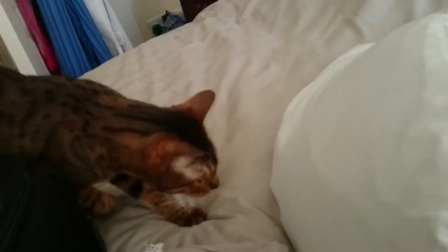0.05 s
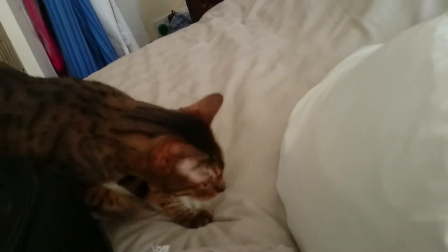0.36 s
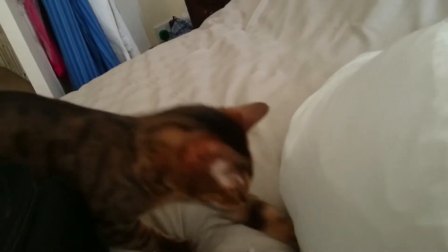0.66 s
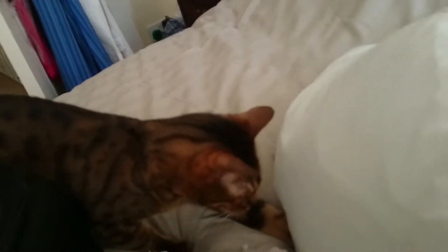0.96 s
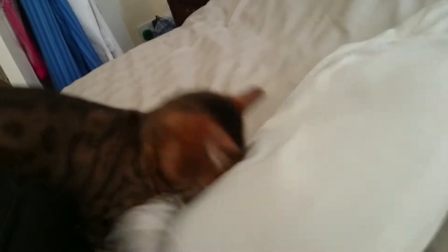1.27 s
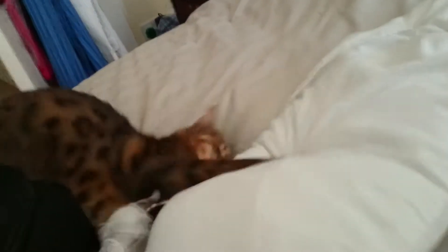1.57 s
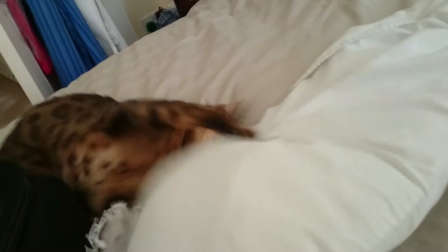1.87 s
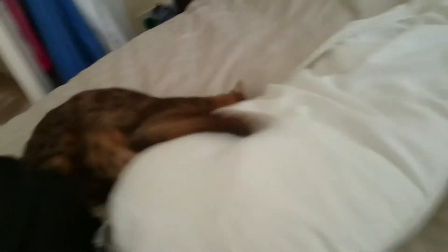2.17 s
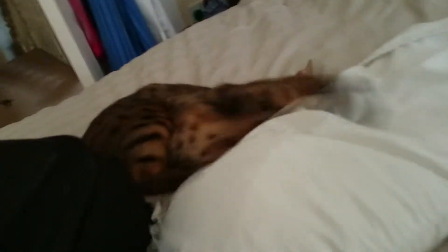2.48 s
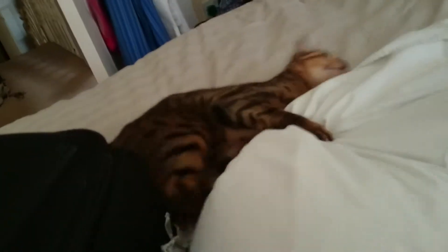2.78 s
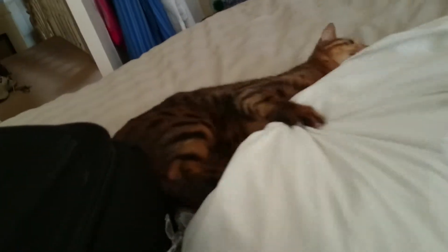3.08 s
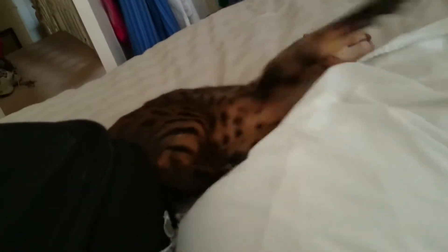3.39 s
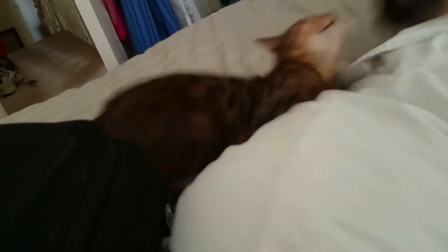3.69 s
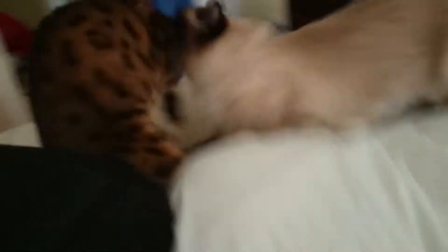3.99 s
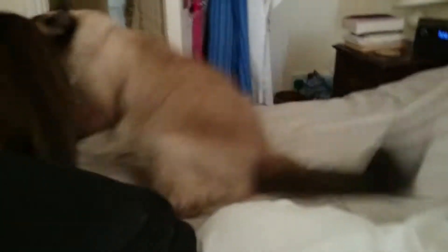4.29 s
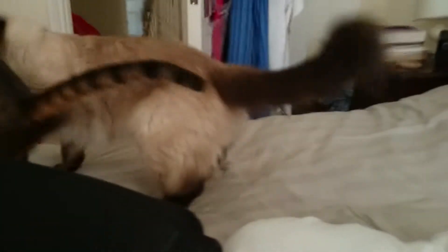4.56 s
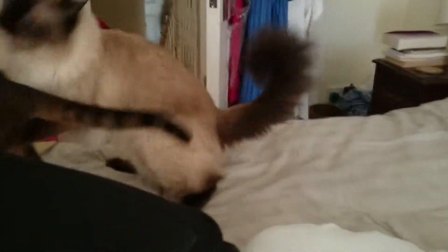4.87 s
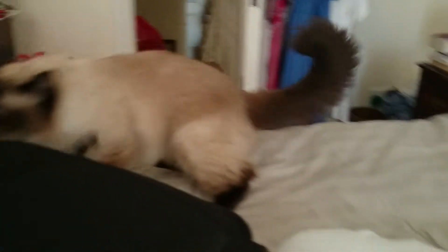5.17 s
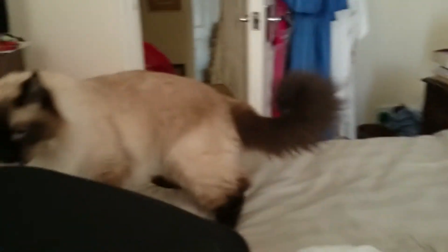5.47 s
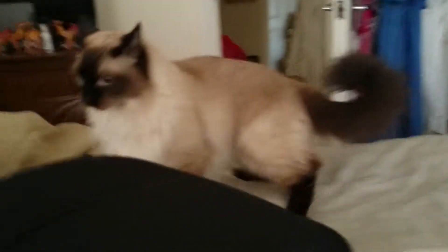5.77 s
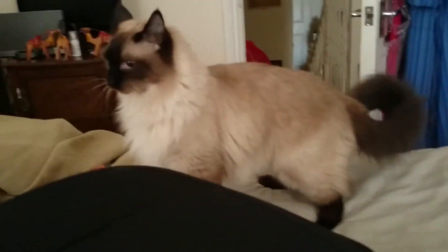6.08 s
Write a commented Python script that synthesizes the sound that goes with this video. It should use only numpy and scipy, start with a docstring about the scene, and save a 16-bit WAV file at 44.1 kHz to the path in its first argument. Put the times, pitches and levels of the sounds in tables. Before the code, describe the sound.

Close, uneven rustling of bedding and muffled paw thuds as two cats tussle on a bed, over a faint low handling rumble.

```python
"""A quiet bedroom, with a hand-held phone right next to two cats wrestling on a duvet.
Paws and bodies thud into the bedding, claws rasp and snag on the cotton, and fur and cloth rub in
swishes. The mattress booms under the landings, and the heaving duvet fans air at the left microphone
port. The hand that holds the phone rests on the right port, which rumbles and creaks softly."""
import sys
import numpy as np
from scipy import signal
from scipy.fft import rfft, irfft, next_fast_len
from scipy.io import wavfile

SR = 44100
rng = np.random.default_rng(int(sys.argv[2]) if len(sys.argv) > 2 else 0)


def file_out(sig):
    """Save sig as 16-bit WAV at sys.argv[1]."""
    # one column per channel
    cols = np.atleast_2d(sig).T
    # limit, then scale
    lim = np.clip(cols, -1, 1)
    pcm = np.round(lim * 32767).astype(np.int16)
    wavfile.write(sys.argv[1], SR, pcm)


N = 275181
TIME = np.arange(N) / SR

# Tone colours of the sources. Each row: frequency in Hz, gain in dB.
ROOM_COLOUR = [(20, -8), (60, 7), (130, -1), (250, -4), (500, -12), (1000, -15), (2000, -18.5), (5000, -26),
               (15000, -45)]  # the still bedroom
FINGER_COLOUR = [(1, -4), (6, -2), (12, -3), (25, -18.5), (50, -25), (100, -34), (200, -55), (400, -50.5),
                 (1500, -91)]  # skin on the port
BUFFET_COLOUR = [(5, 1), (25, 4), (60, -1), (110, -6.5), (200, -13.5), (600, -61.5)]  # air on the port
CASE_COLOUR = [(80, -10.5), (200, -4.5), (300, -1), (420, 2), (600, -13), (1000, -22), (3000, -41),
               (10000, -76)]  # the creaking phone case
HISS_COLOUR = [(300, -17.5), (1200, -9), (2800, -1.5), (5000, -4), (8000, -2), (12000, -5.5),
               (16000, -14.5)]  # the duvet's surface
CRUMPLE_COLOUR = [(50, -6), (110, 13.5), (220, 6), (400, 5), (900, 0.5), (2000, -3.5), (4000, -13),
                  (9000, -45.5)]  # its filling
SNAG_COLOUR = [(200, -13), (900, 6), (2300, 7.5), (5000, 5), (9000, 5.5), (13500, -1), (16000, -10.5)]  # plucked cotton threads
# Each microphone port is a small tube with its own resonances. Each row: frequency in Hz, gain in dB.
LEFT_PORT_COLOUR = [(100, 3.5), (4000, 0), (5500, -2.5), (6800, -1.5), (8300, 8.5), (9500, 1.5),
                    (10800, 2.5), (12100, 7), (13900, -10.5), (15000, 3)]
RIGHT_PORT_COLOUR = [(100, 7.5), (400, 2), (1000, -1), (2500, -2), (4600, 1), (5800, 8), (7200, -10),
                     (9500, -15), (13500, -10.5), (15200, -6)]
# The finger on the right port, firmer as the hand follows the cats.
# Each row: time in seconds, relative level in dB.
FINGER_PRESSURE = [(0, -44.5), (.3, -59.5), (.9, -51.5), (1.45, -48), (2.2, -51.5), (3.05, -44.5),
                   (3.35, -56.5), (3.95, -41.5), (4.75, -50), (5.25, -43.5), (6.24, -48)]
# Fingers slipping on the case. Each row: start in seconds, level in dB, length in seconds.
CASE_CREAKS = [(0.458, -58.5, 0.0041), (0.864, -50.5, 0.01), (1.512, -51, 0.0066), (1.8, -56.5, 0.0057),
               (2.348, -54, 0.0078), (2.719, -53.5, 0.017), (3.306, -55.5, 0.0027), (4.661, -59.5, 0.05),
               (5.011, -58, 0.029), (5.066, -59.5, 0.045), (5.419, -52, 0.035), (5.548, -51, 0.024),
               (5.594, -55.5, 0.058), (5.784, -72, 0.028), (5.879, -56.5, 0.022), (6.087, -56.5, 0.029),
               (6.192, -50.5, 0.019)]
# The duvet fanning the left port. Each row: peak time and fall time in seconds, relative level in dB.
DUVET_GUSTS = [(1.27, .04, -48), (1.48, 0.037, -43), (1.89, .04, -52), (2.0, .06, -52), (2.81, .04, -41),
               (3.08, .05, -41), (3.56, .1, -50), (3.88, 0.11, -41), (4.12, .08, -44), (4.37, 0.2, -48),
               (4.92, 0.045, -45.5)]
# The cats shifting on the bedding between sweeps. Each row: time in seconds, relative level in dB.
STIRRING = [(.5, -82), (.7, -67.5), (1.16, -93), (1.35, -69), (1.85, -68.5), (2.75, -62), (3.3, -70),
            (3.85, -59.5), (4.27, -68.5), (4.65, -64.5), (5.15, -70.5), (5.8, -68.5), (6.24, -77)]
# A limb or body sweeping over the cloth. Each row: peak time and fall time in seconds,
# relative levels of surface hiss and of crumpling filling in dB.
CLOTH_SWISHES = [(0.562, 0.037, -62.5, -63.5), (0.725, 0.067, -59, -58.5), (1.245, 0.031, -64, -54.5),
                 (1.282, 0.061, -50, -54.5), (1.44, 0.035, -57, -57), (1.554, 0.19, -65, -63.5),
                 (1.62, 0.042, -58.5, -52), (1.722, 0.053, -56, -59), (2.003, 0.04, -65.5, -55),
                 (2.159, 0.019, -57, -54), (2.3, 0.053, -61.5, -59.5), (2.46, 0.057, -50.5, -59),
                 (2.599, 0.052, -56.5, -54), (2.73, 0.052, -57, -65), (2.8, 0.041, -52, -49.5),
                 (2.989, 0.037, -58, -58), (3.077, 0.045, -52, -50), (3.396, 0.056, -65, -62.5),
                 (3.584, 0.087, -57.5, -57), (3.761, 0.064, -55, -52), (3.942, 0.094, -48, -54.5),
                 (4.014, 0.056, -45, -45.5), (4.214, 0.035, -55.5, -52.5), (4.356, 0.043, -57, -56.5),
                 (4.491, 0.021, -49.5, -55.5), (4.559, 0.045, -56, -58), (4.767, 0.073, -61.5, -93),
                 (5.294, 0.061, -68, -60.5), (5.59, .08, -84, -63.5), (5.764, 0.039, -59, -56),
                 (5.886, 0.024, -65.5, -67)]
# The hiss above 10 kHz, duller once the cats move away. Each row: time in seconds, gain in dB.
HISS_SHEEN = [(.7, 1), (2.1, 2.5), (3.9, -0.5), (4.4, -3), (6.24, -3)]
# Paws and bodies hitting the duvet. Each row: start in seconds, level in dB, contact time in ms.
PAW_BLOWS = [(0.55, -54.5, 0.36), (0.7039, -50.5, 0.44), (0.714, -49, 0.51), (1.2595, -43.5, 0.18),
             (1.275, -53, 0.1), (1.437, -54, 0.18), (1.6053, -48.5, 0.34), (1.616, -46.5, 0.24),
             (1.869, -55, 0.39), (1.9784, -42.5, 0.077), (1.99, -53, 0.076), (2.036, -50, 0.14),
             (2.292, -54, 0.23), (2.5281, -34.5, 0.24), (2.5912, -44, 0.26), (2.805, -35, 0.46),
             (2.809, -36.5, 2), (2.8308, -45, 0.092), (3.0658, -32, 0.097), (3.0701, -36.5, 1.7),
             (3.0826, -39.5, 0.17), (3.0955, -43, 0.16), (3.1063, -44.5, 1), (3.1376, -49.5, 0.74),
             (3.172, -49.5, 1.4), (3.3983, -48, 0.57), (3.5262, -48, 0.77), (3.617, -43.5, 0.44),
             (3.727, -47, 0.21), (3.7409, -51, 0.14), (3.9411, -31.5, 0.64), (3.96, -47.5, 0.25),
             (4.0048, -35.5, 0.16), (4.0081, -31, 1.16), (4.025, -41, 0.47), (4.0294, -34, 0.26),
             (4.0608, -46.5, 0.16), (4.081, -48, 0.18), (4.1867, -51.5, 0.32), (4.198, -48.5, 0.88),
             (4.338, -50, 0.99), (4.358, -53.5, 0.38), (4.5407, -55.5, 1.1), (5.256, -55.5, 0.11),
             (5.287, -55, 0.37), (5.748, -53.5, 0.16), (5.7756, -56.5, 0.045)]
# The padded duvet's brief resonances. Each row: frequency in Hz, width in Hz, gain in dB.
DUVET_MODES = [(192, 140, -4.5), (247, 145, -3.5), (775, 660, -6), (966, 106, -12), (1870, 1200, -22)]
# A claw or pad dragged over the weave. Each row: start and length in seconds, pitch in Hz, level in dB.
WEAVE_SCRAPES = [(0.674, 0.064, 3300, -60), (1.28, 0.045, 3750, -51), (1.429, 0.026, 2800, -72),
                 (1.672, 0.057, 8100, -60), (2.445, 0.047, 8850, -54.5), (2.546, 0.079, 2080, -55.5),
                 (2.606, 0.058, 2220, -58), (2.685, 0.07, 9400, -61), (3.505, 0.046, 1400, -62),
                 (3.949, 0.11, 2290, -52.5), (4.176, 0.016, 1550, -54.5), (4.532, 0.083, 4800, -57.5),
                 (4.926, 0.031, 2040, -63), (4.95, 0.028, 2510, -65.5), (5.058, 0.068, 800, -66),
                 (5.23, 0.04, 1900, -67), (5.256, 0.023, 825, -57.5), (5.29, .05, 1300, -71),
                 (5.747, 0.051, 2620, -63), (5.412, 0.044, 930, -63), (5.673, 0.027, 1500, -62.5)]
# Claws snapping free of the cotton.
# Each row: start in seconds, relative level in dB, decay in ms, gain of the top treble in dB.
CLAW_SNAGS = [(1.2423, -49, 2.2, 1), (1.259, -50, 2.4, -10), (1.675, -54, 2.1, -7), (1.978, -52, 1.4, -1),
              (2.1512, -41.5, 0.96, 11), (2.5282, -41, .7, 1), (2.8037, -39, 1.7, -2.5),
              (3.041, -57.5, 2, 5), (3.067, -58, 2.8, 6), (3.083, -60, 3, -3), (3.375, -58, 1.6, 12),
              (3.3968, -48.5, 0.97, -6), (3.617, -53, 1.3, 2), (3.7412, -46.5, 2, -3),
              (4.026, -41, 2.9, -12), (4.541, -47.5, 1.8, 3), (4.5488, -48.5, 10, -10)]
# A cat's weight sinking into the mattress. Each row: start in seconds, level in dB.
LANDINGS = [(3.422, -57), (3.525, -44), (3.622, -42.5), (4.07, -43.5), (4.191, -46), (4.381, -42.5)]
# The mattress's resonances. Each row: frequency in Hz, seconds to fall 60 dB, gain in dB.
MATTRESS_MODES = [(101.7, 0.16, 2), (114.8, 0.16, 2.5)]


def undb(db):
    """Decibels to gain."""
    return 10 ** (np.asarray(db) / 20)


def unit(x):
    """Scale to rms 1."""
    return x / np.sqrt(np.mean(x ** 2))


def at_level(x, db):
    """Give a short sound the energy of 10 ms at this level."""
    return x * undb(db) / np.sqrt(np.sum(x ** 2) / (.01 * SR))


def curve(table):
    """Join (seconds, value) points into a line through time."""
    return np.interp(TIME, *np.transpose(table))


def add(track, start, x):
    """Mix a short sound into a track at a start in seconds."""
    i = int(start * SR)
    track[..., i:i + x.shape[-1]] += x[..., :N - i]


def colour(x, points):
    """Causal filter through (Hz, dB) points, from the cepstrum of its log gain."""
    size = next_fast_len(x.shape[-1] // 2 + 4096, real=True) * 2
    hz, db = np.transpose(points)
    log_hz = np.log(np.fft.rfftfreq(size, 1 / SR) + 0.00091)
    cepstrum = irfft(np.log(undb(np.interp(log_hz, np.log(hz), db))))
    cepstrum[1:size // 2] *= 2
    cepstrum[size // 2 + 1:] = 0
    return irfft(rfft(x, size) * np.exp(rfft(cepstrum)))[..., :x.shape[-1]]


def wander(rate_hz):
    """Smooth random wandering with rms 1."""
    knots = rng.standard_normal(4096)
    return unit(np.interp(TIME * rate_hz, np.arange(len(knots)), knots))


def stereo(pair, alike):
    """Mix two unrelated signals into a left and a right that are partly alike."""
    mid, side = np.sqrt(1 + alike) * pair[0], np.sqrt(1 - alike) * pair[1]
    return np.array([mid + side, mid - side]) / np.sqrt(2)


def fibre_slips(per_s, spread_db):
    """Two streams of tiny clicks, most weak and a few strong."""
    sizes = undb(spread_db * np.minimum(rng.exponential(size=(2, N)), 5))
    return unit((rng.random((2, N)) < per_s / SR) * sizes * rng.choice([-1, 1], (2, N)))


def motion(moves, steady_db, rise_share=0.73):
    """Gain of movements that gather speed and come to rest; their powers add over a steady level."""
    power = 0
    for peak_s, fall_s, db in moves:
        lag = (TIME - peak_s) / fall_s
        from_peak = np.maximum(-lag / rise_share, lag)
        swell = np.exp(-np.minimum(from_peak, 20) ** 1.34)
        power += (undb(db) * swell) ** 2
    return np.sqrt(undb(steady_db) ** 2 + power)


def room_tone(level_db=-67):
    """The bedroom's faint, steady background."""
    noise = stereo(rng.standard_normal((2, N)), alike=0.17)
    return undb(level_db) * unit(colour(noise, ROOM_COLOUR))


def port_rumble(finger_db=9, tremble_db=2, draught_db=5.5, buffet_db=-2):
    """An unsteady finger presses on the right port; air moved by the cats and cloth buffets the left."""
    finger = unit(colour(rng.standard_normal(N), FINGER_COLOUR))
    right = finger * undb(curve(FINGER_PRESSURE) + finger_db + tremble_db * wander(9.8))
    airflow = motion(DUVET_GUSTS, curve(STIRRING) + draught_db)
    buffet = unit(colour(rng.standard_normal(N), BUFFET_COLOUR))
    left = buffet * airflow * undb(buffet_db + 2.5 * wander(2.54))
    return np.array([left, right])


def bedding(hiss_db=-2, stir_crumple_db=-2.5, patchy_db=1.8):
    """Fibres slip densely on the surface; bigger folds give way in uneven jerks below."""
    stir_db = curve(STIRRING)
    sliding = motion([(s, fall, db) for s, fall, db, _ in CLOTH_SWISHES], stir_db)
    folding = motion([(s, fall, db) for s, fall, _, db in CLOTH_SWISHES], stir_db + stir_crumple_db)
    jerk = wander(70)
    slips = stereo(fibre_slips(per_s=11000, spread_db=2.5), alike=0.057)
    # patches of cloth slide at different speeds, so each pitch range swells and fades by itself
    size = next_fast_len(N, real=True)
    spectrum, hz = rfft(slips, size), np.fft.rfftfreq(size, 1 / SR)
    edges_hz = [0, 1200, 1900, 2800, 4000, 5600, 7600, 10000, SR]
    bands = [irfft(spectrum * (hz >= low) * (hz < high), size)[:, :N] * undb(patchy_db * wander(30))
             for low, high in zip(edges_hz, edges_hz[1:])]
    bands[-1] *= undb(curve(HISS_SHEEN))
    hiss = unit(colour(sum(bands), HISS_COLOUR))
    folds = stereo(fibre_slips(per_s=2500, spread_db=2.0), alike=0.6)
    crumple = unit(colour(folds, CRUMPLE_COLOUR))
    return hiss * sliding * undb(hiss_db + 1.4 * jerk) + crumple * folding * undb(2.13 * jerk)


def case_creaks(slip_hz=170, bump_hz=105, bump_db=3, bump_fade_db_per_s=170, left_db=-36):
    """A fingertip by the right port lets go with a dull bump, then sticks and slips on the case."""
    out, t = np.zeros(N), TIME[:SR // 10]
    bump = np.sin(2 * np.pi * bump_hz * t) * np.exp(-t / 0.0048)
    for start, db, length in CASE_CREAKS:
        gaps, sizes = rng.uniform(.3, 1.7, (2, 64))
        slip_s = (np.cumsum(gaps) - gaps[0]) / slip_hz
        inside = slip_s < length
        slips = np.bincount((slip_s[inside] * SR).astype(int), sizes[inside], SR // 8)
        creak = colour(slips, CASE_COLOUR)
        # a long, easy slip starts with less of a bump
        add(out, start, at_level(bump, db + bump_db - bump_fade_db_per_s * length))
        add(out, start, creak * undb(db) / np.sqrt(np.sum(creak ** 2) / (length * SR)))
    return np.array([undb(left_db) * out, out])


def paws(scuff_db=-13, scuff_s=0.012, flap_db=-13):
    """Each blow pushes into the duvet and scuffs the cloth; a softer contact is longer and duller."""
    out, t = np.zeros((2, N)), TIME[:SR // 10]
    for start, db, contact_ms in PAW_BLOWS:
        push = t * np.exp(-t / (max(contact_ms, .05) / 1000))
        thud = sum(undb(mode_db) * signal.lfilter(*signal.iirpeak(hz, hz / width, fs=SR), push)
                   for hz, width, mode_db in DUVET_MODES)
        # the filling swallows the treble
        thud = colour(thud, [(1400, -6.0), (3000, -7.5), (8000, -21)])
        noise = stereo(rng.standard_normal((2, len(t))), alike=0.26)
        scuff = colour(noise * np.exp(-t / scuff_s),
                       [(100, -18), (270, 9.5), (480, 12), (950, 11.5), (2200, 1), (6000, -3),
                        (15000, -28)])
        # loose folds flap on for a moment
        flap = colour(noise * t * np.exp(-t / 0.011),
                      [(40, -31), (110, -5.5), (200, -12), (400, -3), (1200, -30)])
        cloth = at_level(scuff, db + scuff_db) + at_level(flap, db + flap_db)
        add(out, start, at_level(-thud, db) + cloth)
    return out


def scrapes(relative_width=0.46, grit_db=-13):
    """Threads pass under the claw at an uneven rate, so each stroke swells into a narrow rasp."""
    out = np.zeros((2, N))
    weave = stereo(fibre_slips(per_s=5000, spread_db=5.5), alike=0.28)
    for start, length, hz, db in WEAVE_SCRAPES:
        i, n = int(start * SR), int(length * SR)
        slips = weave[:, i:i + n]
        rasp = signal.lfilter(*signal.iirpeak(hz, 1 / relative_width, fs=SR), slips)
        rasp = unit(signal.lfilter(*signal.iirpeak(hz, .5 / relative_width, fs=SR), rasp))
        add(out, start, undb(db) * (rasp + undb(grit_db) * unit(slips)) * np.hanning(n) ** 0.39)
    return out


def claws(snap_db=-1, shiver_db=-14, shiver_s=0.0048, twang_hz=4050, twang_db=-14):
    """A thread jumps off the claw with a tick, its neighbours follow, and the taut cloth shivers."""
    out, t = np.zeros((2, N)), TIME[:SR // 10]
    for start, db, decay_ms, treble_db in CLAW_SNAGS:
        noise = stereo(rng.standard_normal((2, len(t))), alike=0.66)
        threads = unit(noise) * np.exp(-t / (decay_ms / 1000))
        threads[:, 0] += 9  # the first thread's tick
        snap = colour(colour(threads, SNAG_COLOUR), [(7000, 0), (12000, treble_db)])
        shiver = at_level(colour(noise * np.exp(-t / shiver_s), SNAG_COLOUR), db + shiver_db)
        hz = twang_hz * (1 + 0.056 * rng.standard_normal())
        twang = np.sin(2 * np.pi * hz * t) * np.exp(-t / 0.0038)
        add(out, start, at_level(snap, db + snap_db) + shiver + at_level(twang, db + twang_db))
    return out


def mattress(give_s=0.0071):
    """The mattress gives slowly under a landing and booms for a few cycles."""
    out, t = np.zeros(N), TIME[:SR // 4]
    ring = sum(undb(db) * np.sin(2 * np.pi * hz * t) * np.exp(-np.log(1000) * t / t60)
               for hz, t60, db in MATTRESS_MODES)
    for start, db in LANDINGS:
        add(out, start, at_level(ring * (1 - np.exp(-t / give_s)), db))
    return out


def bedroom(x, t60_s=0.26, tail_gain_db=-22):
    """A small, softly furnished room answers faintly behind the close sound."""
    t = TIME[:SR // 2]
    tail = rng.standard_normal((2, len(t))) * np.exp(-np.log(1000) * t / t60_s) * (t > .006)
    tail /= np.sqrt(np.sum(tail ** 2) / 2)
    tail = colour(tail, [(80, -24), (400, 9), (4000, 9.5), (15000, -40)])
    return x + undb(tail_gain_db) * signal.fftconvolve(x, tail, axes=1)[:, :N]


def scene():
    """The tussle close by in the room, with rumble and creaks right on the phone."""
    tussle = paws() + mattress() + claws() + scrapes() + bedding()
    return bedroom(tussle) + room_tone() + port_rumble() + case_creaks()


def record(dry, port_lag_s=3 / SR, self_noise_db=-78, top_hz=15600):
    """The two ports colour the sound, the microphones add their own hiss, and the top is cut."""
    heard = np.array([colour(dry[0], LEFT_PORT_COLOUR), colour(dry[1], RIGHT_PORT_COLOUR)])
    # the ports lie a few centimetres apart, and the right one is reached later
    heard[1] = np.interp(TIME - port_lag_s, TIME, heard[1])
    heard += undb(self_noise_db) * rng.standard_normal((2, N))
    return signal.sosfilt(signal.ellip(12, .2, 60, top_hz, fs=SR, output="sos"), heard)


dry = scene()
out = record(dry)
file_out(out)
```